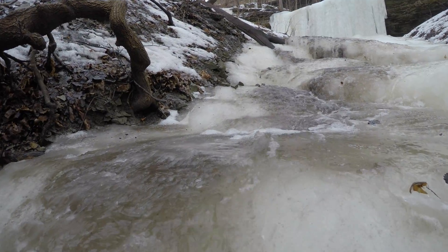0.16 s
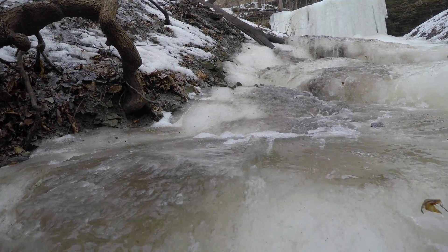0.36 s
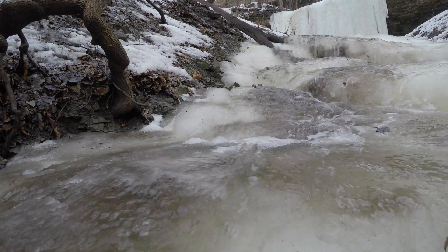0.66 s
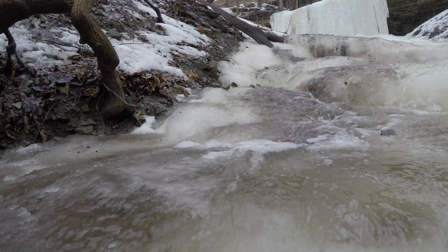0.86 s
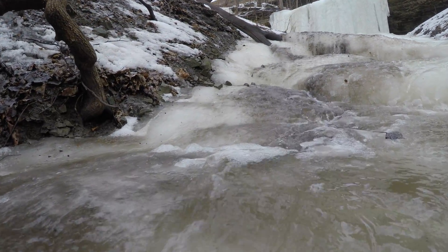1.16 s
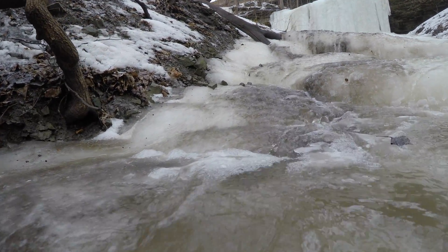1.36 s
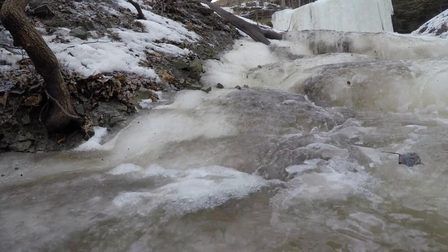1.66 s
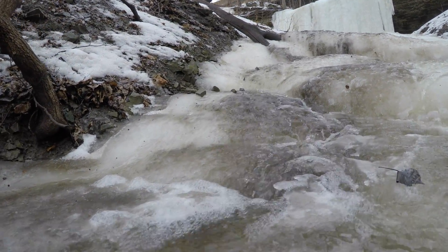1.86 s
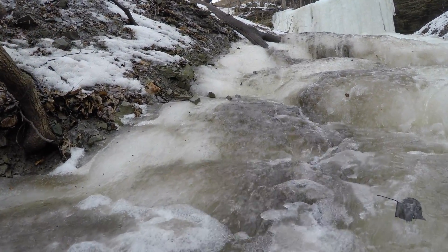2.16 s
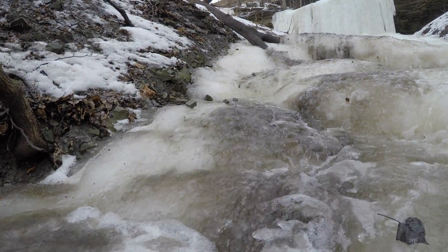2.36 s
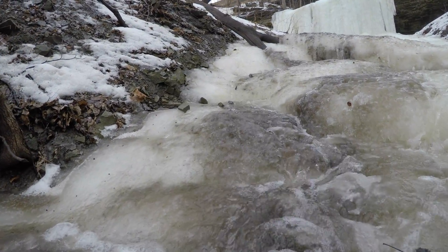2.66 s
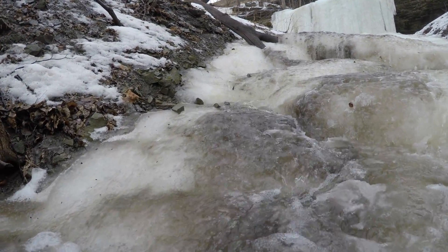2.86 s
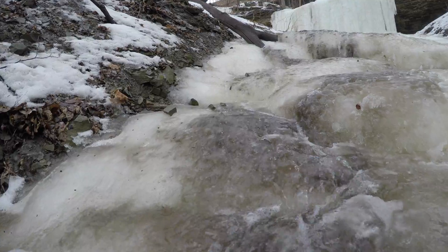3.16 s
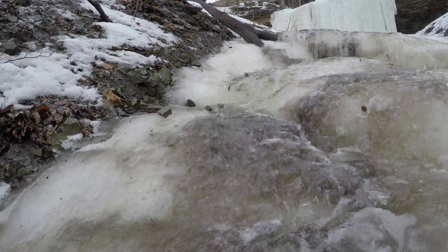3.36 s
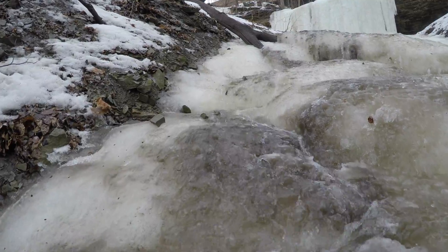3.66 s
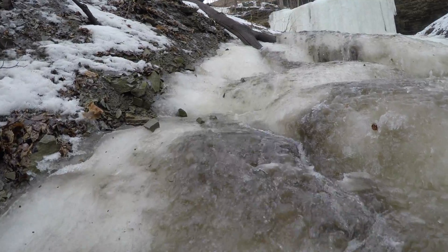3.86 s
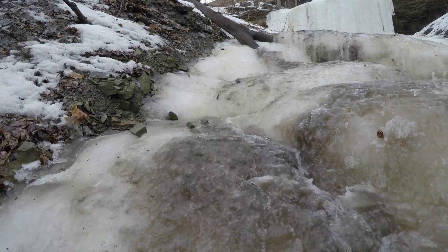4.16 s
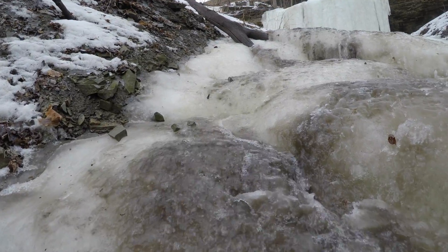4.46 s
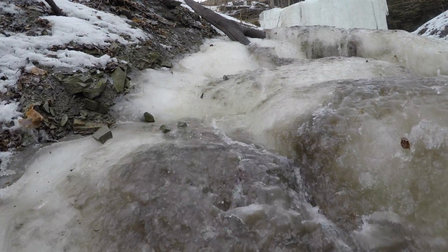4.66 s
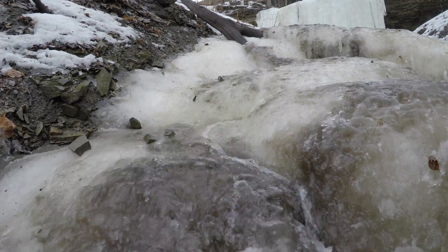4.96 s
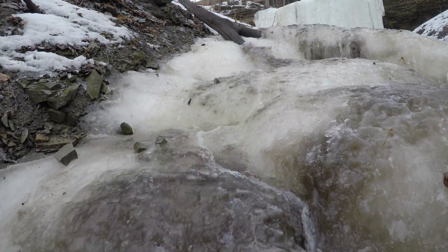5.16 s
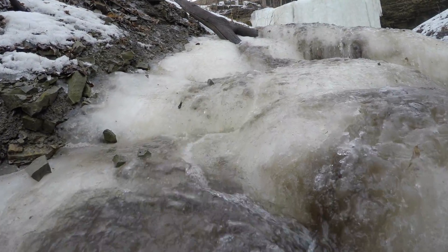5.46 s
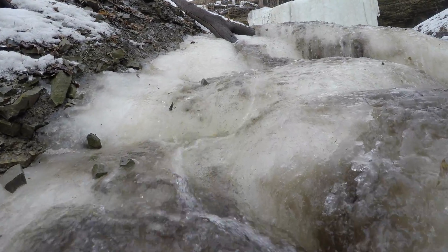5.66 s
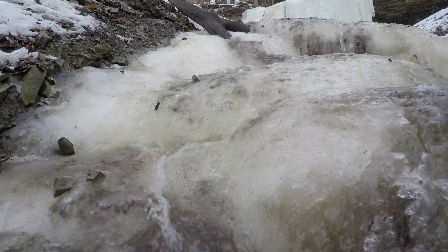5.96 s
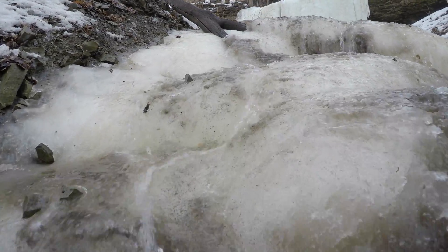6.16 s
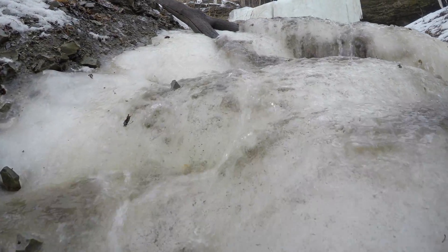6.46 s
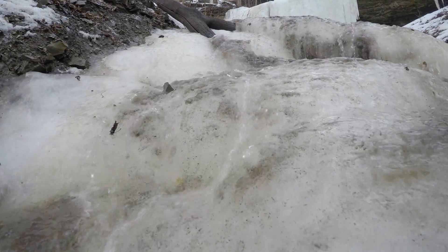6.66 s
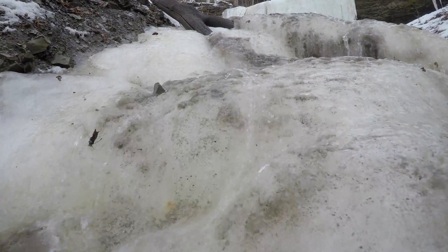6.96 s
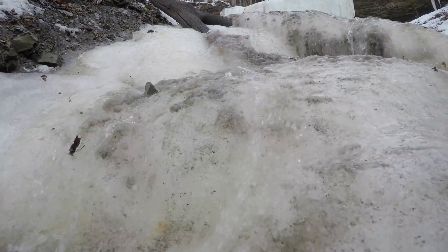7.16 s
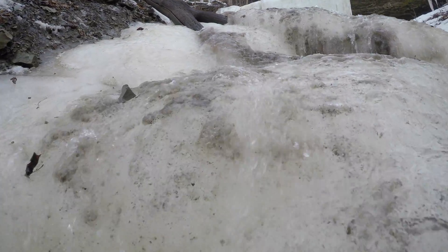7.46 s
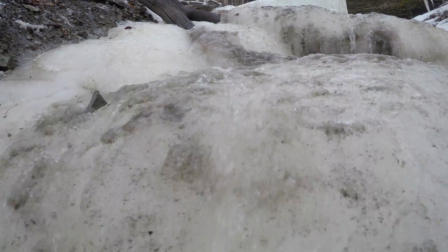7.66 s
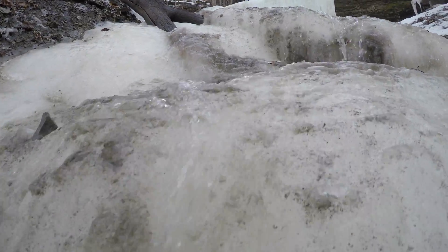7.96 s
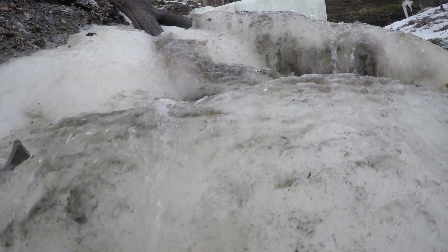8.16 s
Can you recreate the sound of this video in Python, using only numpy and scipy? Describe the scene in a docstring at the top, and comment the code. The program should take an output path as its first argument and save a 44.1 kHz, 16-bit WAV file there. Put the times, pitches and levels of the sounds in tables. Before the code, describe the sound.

Outdoors, close to the microphone, shallow water trickles and spatters continuously over ice, dotted with high plips and a soft gurgle. Uneven footsteps crunch and scuff on slushy ice, mixed with boxy handling bumps that are strongest in the first half. The trickle swells slightly as a small cascade comes nearer, and low wind buffeting builds, with a few soft puffs in the last seconds.

```python
"""Meltwater over a frozen creek

A thin sheet of water makes a bright rush of tiny bursting bubbles, with single plips close by.
Someone walks upstream with a camera in a case: steps crunch on wet ice and knocks excite the
resonances of the case. Air buffets the microphone more and more as the little cascade comes near."""
import sys
import numpy as np
from scipy import signal
from scipy.fft import rfft, irfft, next_fast_len
from scipy.io import wavfile
from scipy.ndimage import uniform_filter1d, map_coordinates

SR = 44100
rng = np.random.default_rng(int(sys.argv[2]) if len(sys.argv) > 2 else 0)


def to_wav(sig):
    """Store sig (one row per channel, or 1-D mono) as 16-bit WAV at the path in sys.argv[1].

    Samples outside -1..1 are clipped; the rate is SR.
    """
    pcm = np.clip(np.atleast_2d(sig), -1, 1) * 32767
    pcm = np.round(pcm).astype(np.int16)
    wavfile.write(sys.argv[1], SR, pcm.T)  # frames by channels


N = 367336

# The water along the way. Each row: time in seconds, relative levels of rush and fizz in dB.
WATER_LEVELS = [(0.0, -41.5, -37.5), (0.32, -39, -37.5), (1.07, -41.5, -39), (1.92, -42, -39.5),
                (4.89, -39.5, -37.5), (6.49, -37.5, -37), (7.86, -35.5, -34), (8.33, -36, -35.5)]
# Spectrum of running water. Each row: frequency in Hz, gain in dB.
WATER_SPECTRUM = [(700, -45), (1100, -22), (1220, -8), (1500, -2), (2000, 0), (2600, -1.7), (3400, 0),
                  (4800, -1.5), (5900, -2.5), (7400, -13.5), (8500, -15.3), (11400, -26), (13500, -27.5),
                  (15300, -32)]
def stream(crossover_hz=3200):
    """Superposition: countless far bubbles merge into a rush; nearer ones fizz and spatter in spurts."""
    rush_db, fizz_db = curves(WATER_LEVELS)
    fizz = bubbles(count=14000, low_hz=1202, high_hz=13800, cycles=1.46, spread_db=1.5)
    fizz *= amp(4.5 * np.tanh(wobble(45)))
    spatter = bubbles(count=2600, low_hz=1376, high_hz=6650, cycles=6, spread_db=4.0, size=600)
    spatter *= amp(1.8 * np.tanh(wobble(17)))
    near = amp(-4.5) * unit(fizz) + amp(-10.5) * unit(spatter)
    water = coloured(rng.standard_normal(N) + near, WATER_SPECTRUM)
    body = filtered(water, lambda hz: 1 / (1 + (hz / crossover_hz) ** 6))
    spurts_db = 0.39 * wobble(25)
    large_bubbles = amp(rush_db - 2 + spurts_db + 0.52 * wobble(22)) * unit(body)
    small_bubbles = amp(fizz_db - 1 + spurts_db + 0.38 * wobble(30)) * unit(water - body)
    return large_bubbles + small_bubbles


# Near drops. Each row: start in seconds, relative level in dB, starting pitch in Hz.
NEAR_DROPS = [(0.035, -18.5, 3710), (.066, -21, 4250), (.155, -15, 5100), (.358, -27.5, 1360),
              (.436, -21, 3870), (1.339, -25.5, 1520), (1.638, -22, 2570), (2.736, -18, 4400),
              (3.119, -15.5, 3700), (3.239, -24, 2270), (3.797, -15.5, 4240), (3.84, -20, 2500),
              (4.647, -15.5, 3870), (5.048, -16, 3840), (5.448, -19, 3460), (5.906, -16.5, 3170),
              (6.063, -19, 4880), (6.296, -23, 1650), (7.407, -16.5, 3900), (7.482, -20.5, 2490),
              (7.566, -15.5, 3520), (7.627, -12.5, 4100), (7.678, -16, 2730), (8.002, -15, 3760),
              (8.028, -13.5, 4100), (8.237, -14.5, 4220)]
def plips(ring_cycles=5.1, noise_cycles=6.9):
    """Resonance: a drop rings a bubble, softened by a brief band of noise around its pitch."""
    out, t = np.zeros(N), np.arange(SR // 30) / SR
    for start, db, hz in NEAR_DROPS:
        band = [(hz / 3, -32), (hz / 2, -10), (hz, 0), (hz * 1.35, -5), (hz * 1.8, -25), (hz * 3, -45)]
        soft_noise = coloured(rng.standard_normal(len(t)), band) * swell(t * hz / noise_cycles) ** 1.35
        ring = bubble(t, hz, ring_cycles / hz, rise=0.12)
        add(out, start, amp(db - 9.5) * ring + amp(db - 10.5) * soft_noise)
    return out


def drips():
    """Bubble resonance at random times: smaller plips, louder where the water fizzes."""
    _, fizz_db = curves(WATER_LEVELS)
    cloud = bubbles(count=160, low_hz=1344, high_hz=5820, cycles=3.8, spread_db=3.5, size=1000)
    return amp(fizz_db - 16) * coloured(cloud, [(1500, 0), (6000, -6)])


# Steps and scuffs. Each row: centre and Gaussian width in seconds, crunch and thud levels in dB.
FOOTSTEPS = [(0.134, 0.023, -36.5, -46), (0.37, 0.046, -39, -46), (0.598, 0.024, -33.5, -38),
             (2.568, 0.0086, -31, -47), (2.617, 0.021, -35.5, -37.5), (3.115, 0.0073, -30.5, -29),
             (3.452, 0.012, -36.5, -41.5), (4.27, 0.038, -34.5, -37.5), (4.467, 0.048, -36.5, -37.5),
             (4.799, 0.026, -36, -39.5), (5.506, 0.024, -43, -39), (5.9, 0.0077, -35, -33),
             (7.124, 0.024, -33, -39.5), (7.537, 0.0087, -26.5, -31.5), (7.582, 0.0054, -34, -29.5)]
def steps():
    """Brittle fracture: wet ice crushes into grains and slush while the jolt rattles the case."""
    out, t = np.zeros(N), np.arange(N) / SR
    grains = bubbles(count=14000, low_hz=1030, high_hz=8660, cycles=3.1, spread_db=6.5)
    crunch = coloured(grains + 1.37 * rng.standard_normal(N), WATER_SPECTRUM)
    thud = unit(case(np.diff(rng.standard_normal(N + 1)), cutoff_hz=433))
    for centre, width, crunch_db, thud_db in FOOTSTEPS:
        near = np.abs(t - centre) < 4 * width
        envelope = np.exp(-.5 * ((t[near] - centre) / width) ** 2)
        out[near] += envelope * (amp(crunch_db) * crunch[near] + amp(thud_db) * thud[near])
    return out


# Handling knocks. Each row: start in seconds, level in dB, treble cutoff in Hz.
CASE_KNOCKS = [(1.587, -15, 5000), (1.592, -21.5, 400), (2.772, -18, 1800), (2.803, -13.5, 1120),
               (3.090, -22, 1500), (3.381, -25.5, 400), (3.537, -27, 300), (4.016, -16.5, 2500),
               (4.468, -23.5, 2500), (4.795, -28, 2500), (5.505, -23.5, 1200), (5.910, -26.5, 600),
               (6.849, -27, 500), (7.039, -23.5, 900), (7.11, -24, 500)]
def knocks():
    """Impulse response: a push rings the case; soft contacts lose treble, hard ones rasp briefly."""
    out, t = np.zeros(N), np.arange(SR // 8) / SR
    push = signal.unit_impulse(len(t))
    for start, db, cutoff_hz in CASE_KNOCKS:
        ring = case(push, cutoff_hz)
        hardness = cutoff_hz / (cutoff_hz + 5000)
        rasp = hardness * coloured(rng.standard_normal(len(t)), WATER_SPECTRUM) * swell(t / 0.0021)
        add(out, start, amp(db) * (ring / np.abs(ring).max() + amp(-6.5) * rasp))
    return out


# Response of the camera case. Each row: frequency in Hz, gain in dB.
CASE_RESPONSE = [(70, -25), (115, -23), (142, -1.5), (168, 2.5), (215, 0), (310, -6), (410, -8), (490, -15),
                 (565, -25.5), (660, -17), (850, -10), (1110, -24), (1500, -7.5), (2600, -31)]
def case(x, cutoff_hz):
    """Forced vibration: x drives the resonances of the case, dulled above the cutoff."""
    return filtered(minimum_phase(x, CASE_RESPONSE), lambda hz: 1 / (1 + 1j * hz / cutoff_hz) ** 2)


# Bands that the case cancels. Each row: centre in Hz, width in Hz.
CASE_NOTCHES = [(565, 56), (1100, 120)]
def notched(x):
    """Antiresonance: the case swallows two narrow bands."""
    def response(hz):
        notches = [(c * c - hz * hz) / (c * c - hz * hz + 1j * hz * w) for c, w in CASE_NOTCHES]
        return np.prod(notches, axis=0)
    return filtered(x, response)


# Strength of the air on the microphone. Each row: time in seconds, level in dB.
WIND_LEVELS = [(0, -51), (1.5, -68), (1.85, -51.5), (2.7, -59), (3.25, -44.5), (4.2, -49.5), (6.1, -38),
               (8.33, -35)]
# Spectrum of the buffeting. Each row: frequency in Hz, gain in dB.
WIND_SPECTRUM = [(12, -2.5), (32, -0.5), (55, 0.5), (100, -7), (160, -11), (260, -28.5), (500, -64),
                 (2000, -100)]
# Puffs as the camera jerks. Each row: start in seconds, level in dB, pitch in Hz.
AIR_PUFFS = [(5.907, -19.5, 188), (7.103, -28, 116), (7.538, -22.5, 95), (7.578, -19.5, 102)]
def wind():
    """Turbulent pressure: lumps of air push on the microphone, with a puff at each jerk."""
    wind_db, = curves(WIND_LEVELS)
    out = amp(wind_db + 0.28 * wobble(12)) * coloured(rng.standard_normal(N), WIND_SPECTRUM)
    t = np.arange(SR // 10) / SR
    for start, db, hz in AIR_PUFFS:
        add(out, start, amp(db) * swell(t / 0.004) * np.sin(2 * np.pi * hz * t))
    return out


# Spectrum of mid-sized bubbles. Each row: frequency in Hz, gain in dB.
BABBLE_SPECTRUM = [(570, -13.5), (640, -7), (740, -5), (870, -4), (1000, -7.5), (1110, -14.5), (1300, -3),
                   (1700, -5.5), (2600, -5), (6000, -60)]
def gurgle():
    """Resonance of the case makes water under the ice sound hollow; bubbles babble with the rush."""
    rush_db, _ = curves(WATER_LEVELS)
    deep = unit(case(rng.standard_normal(N), cutoff_hz=776))
    cloud = bubbles(count=3500, low_hz=611.5, high_hz=2352, cycles=3.54, spread_db=-0.5, size=1100)
    babble = coloured(cloud + 0.92 * rng.standard_normal(N), BABBLE_SPECTRUM)
    return amp(-44.5 + 0.98 * wobble(20)) * deep + amp(rush_db - 9 + 1.1 * wobble(24)) * babble


# Big air pockets under the ice. Each row: start in seconds, level in dB, starting pitch in Hz.
AIR_POCKETS = [(2.045, -40, 377), (2.600, -28.5, 286), (2.612, -26.5, 360), (4.297, -29, 310),
               (4.754, -30, 262), (5.500, -29, 295)]
def glugs(cycles_to_peak=1.56):
    """Heavily damped resonance: trapped air rings low for a few cycles."""
    out, t = np.zeros(N), np.arange(SR // 12) / SR
    for start, db, hz in AIR_POCKETS:
        add(out, start, amp(db) * bubble(t, hz, cycles_to_peak / hz, rise=0.023))
    return out


# Fine ticks of ice. Each row: start in seconds, level in dB.
ICE_TICKS = [(.587, -48), (2.432, -41), (2.617, -41), (5.505, -44), (5.896, -46), (7.041, -45)]
def ticks(rise_s=0.0034):
    """Fracture of tiny crystals: ice snaps in the high treble; fainter ticks prickle all along."""
    out = amp(-70.5) * bubbles(count=200, low_hz=7400, high_hz=13700, cycles=7, spread_db=3)
    t = np.arange(SR // 50) / SR
    band = [(3000, -30), (8000, 8), (10500, -22), (13200, 0), (15500, -14)]
    for start, db in ICE_TICKS:
        snap = coloured(rng.standard_normal(len(t)), band)
        add(out, start, amp(db) * swell(t / rise_s) * snap)
    return out


def bubble(t, hz, peak_s, rise):
    """A damped oscillator: a bubble swells until peak_s, then fades while its pitch climbs."""
    return swell(t / peak_s) * np.sin(2 * np.pi * hz * t * (1 + rise * np.tanh(t / peak_s / 10)))


def bubbles(count, low_hz, high_hz, cycles, spread_db, size=300):
    """Shot noise: rings of random time, pitch, decay and level, each size samples long, at rms 1."""
    when, pitch, chance, length = rng.random((4, count, 1))
    hz = low_hz * (high_hz / low_hz) ** pitch
    k = np.arange(size)
    peak_s = np.minimum(cycles * (.4 + length) / hz, size / SR / 6)
    gain = amp(-spread_db * np.log(chance + .02)) * hz
    waves = gain * bubble(k / SR, hz, peak_s, rise=0.079)
    positions = (when * N).astype(int) + k
    return unit(np.bincount(positions.ravel(), waves.ravel(), N)[:N])


def swell(u):
    """A critically damped pulse: rises to 1 at u = 1, then dies away."""
    return u * np.exp(1 - u)


def amp(db):
    """Decibels as an amplitude ratio."""
    return 10 ** (np.asarray(db) / 20)


def unit(x):
    """Normalisation to rms 1."""
    return x / np.sqrt(np.mean(x ** 2) + 1e-20)


def curves(rows):
    """Linear interpolation: one value per sample for each column after the time."""
    times, *columns = np.transpose(rows)
    return [np.interp(np.arange(N) / SR, times, column) for column in columns]


def wobble(rate):
    """Smooth random modulation, rate knots a second."""
    knots = rng.standard_normal(int(N * rate / SR) + 4)
    return map_coordinates(knots, [np.arange(N) * rate / SR])


def filtered(x, response):
    """Linear filtering: the spectrum of x times a function of frequency."""
    m = next_fast_len(len(x) + 8192)
    return irfft(rfft(x, m) * response(np.fft.rfftfreq(m, 1 / SR)), m)[:len(x)]


def gain_at(hz, points):
    """Magnitude response through (Hz, dB) points on a logarithmic frequency axis."""
    f, db = np.transpose(points)
    return amp(np.interp(np.log(hz + 1), np.log(f), db))


def coloured(x, points):
    """Spectral shaping by (Hz, dB) points, at rms 1."""
    return unit(filtered(x, lambda hz: gain_at(hz, points)))


def minimum_phase(x, points):
    """Causality: a (Hz, dB) response that rings only after each push."""
    m = next_fast_len(len(x) + 8192)
    cepstrum = irfft(np.log(gain_at(np.fft.rfftfreq(m, 1 / SR), points)), m)
    fold = 1 + np.sign(m / 2 - np.arange(m)) * (np.arange(m) > 0)
    return irfft(rfft(x, m) * np.exp(rfft(cepstrum * fold)), m)[:len(x)]


def add(track, start_s, sound):
    """Superpose a sound on the track."""
    part = track[max(round(start_s * SR), 0):][:len(sound)]
    part += sound[:len(part)]


def widened(mono, split_hz=11700, spread=0.77, lean=0.26):
    """Decorrelation: the channels differ only above the split, which spreads out and leans right."""
    treble = filtered(mono, lambda hz: hz > split_hz)
    envelope = np.sqrt(np.abs(uniform_filter1d(treble ** 2, size=128)))
    noise = coloured(rng.standard_normal(N), WATER_SPECTRUM)
    hiss = unit(filtered(noise, lambda hz: hz > split_hz))
    side = spread * envelope * hiss - lean * treble
    return np.array([mono + side, mono - side])


def scene():
    """Superposition of water, wind and the walker at the microphone."""
    surroundings = stream() + drips() + gurgle() + glugs() + wind() + ticks()
    close_sounds = notched(plips() + knocks() + steps())
    return widened(surroundings + close_sounds)


def record(dry):
    """Band limiting: the camera passes nothing above 15400 Hz."""
    return np.array([filtered(channel, lambda hz: hz < 15400) for channel in dry])


dry = scene()
out = record(dry)
to_wav(out)
```